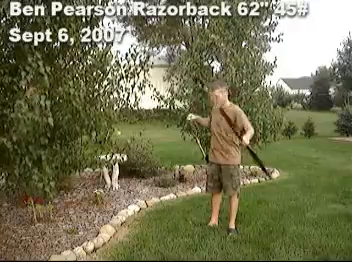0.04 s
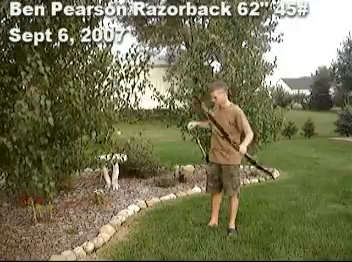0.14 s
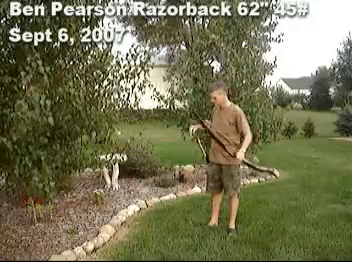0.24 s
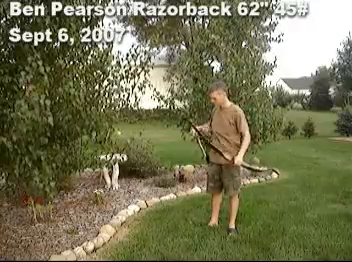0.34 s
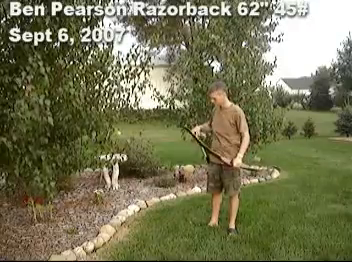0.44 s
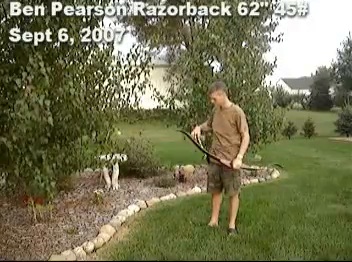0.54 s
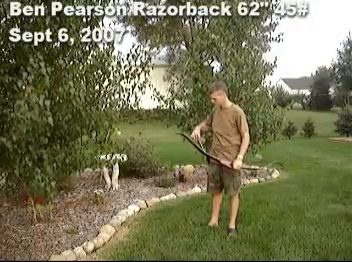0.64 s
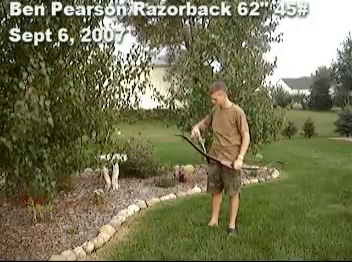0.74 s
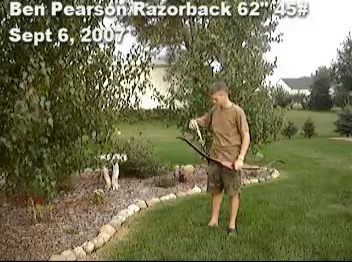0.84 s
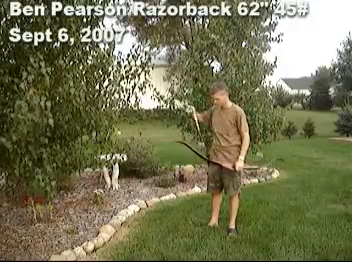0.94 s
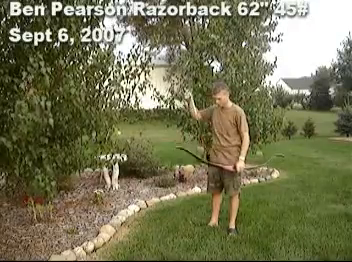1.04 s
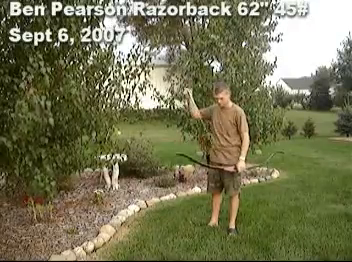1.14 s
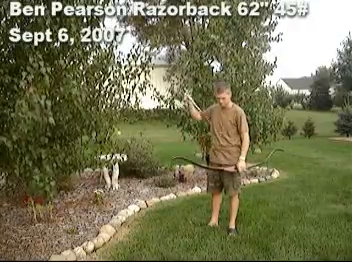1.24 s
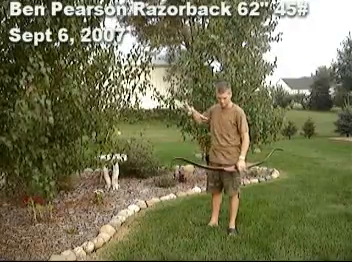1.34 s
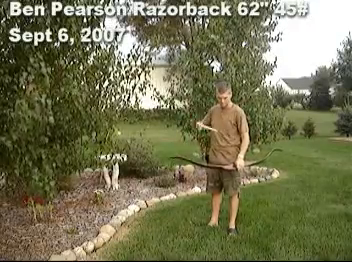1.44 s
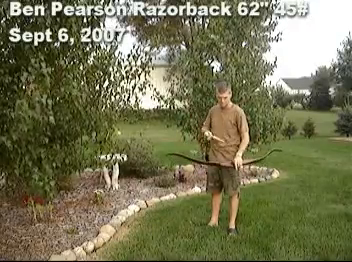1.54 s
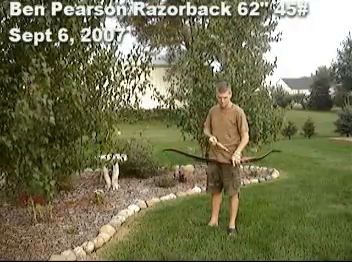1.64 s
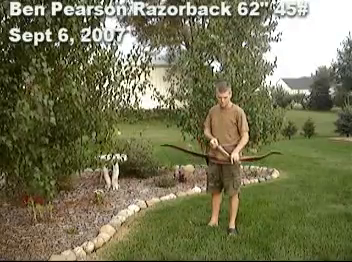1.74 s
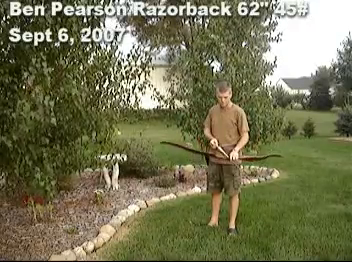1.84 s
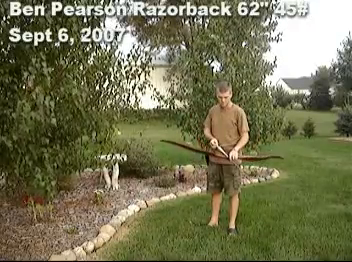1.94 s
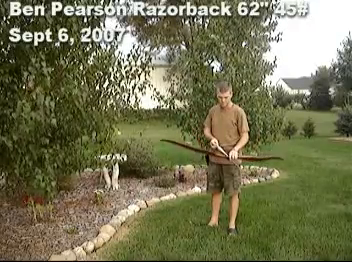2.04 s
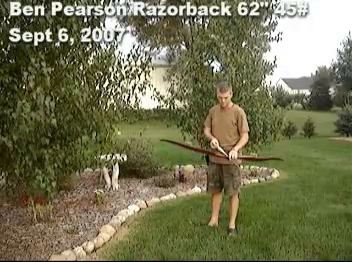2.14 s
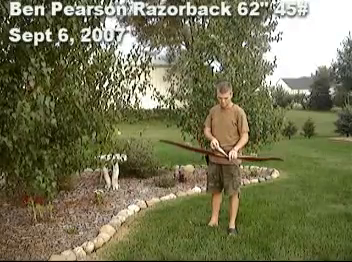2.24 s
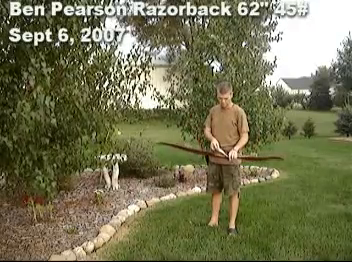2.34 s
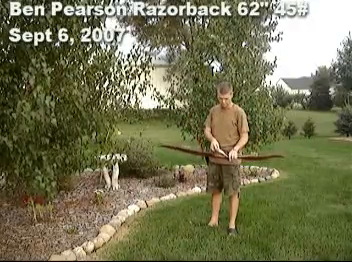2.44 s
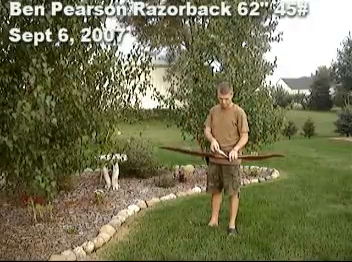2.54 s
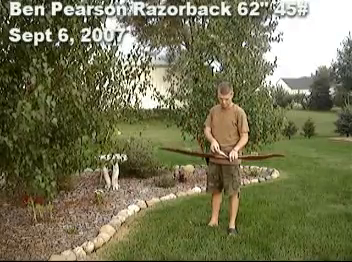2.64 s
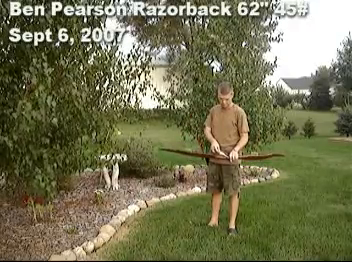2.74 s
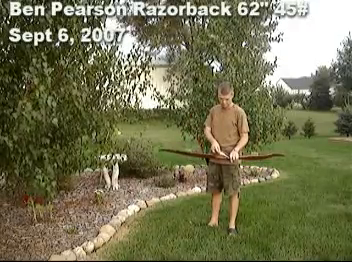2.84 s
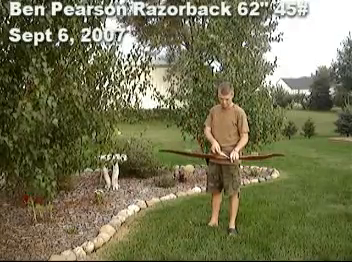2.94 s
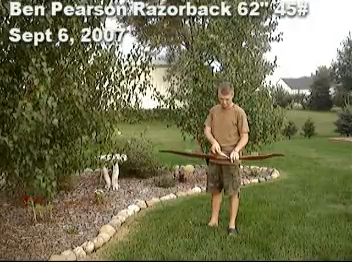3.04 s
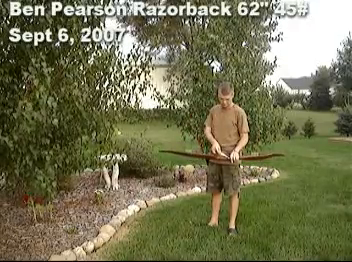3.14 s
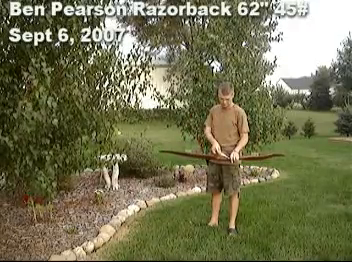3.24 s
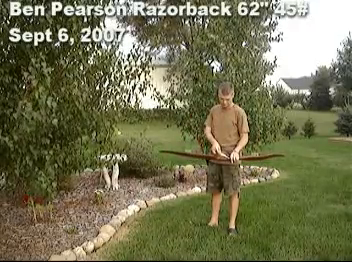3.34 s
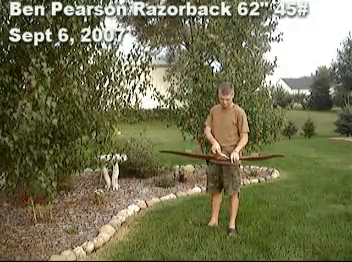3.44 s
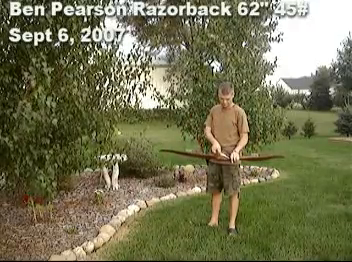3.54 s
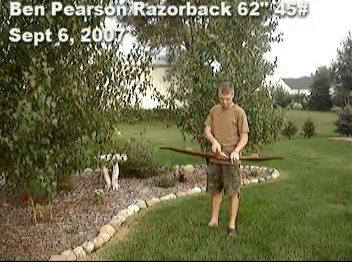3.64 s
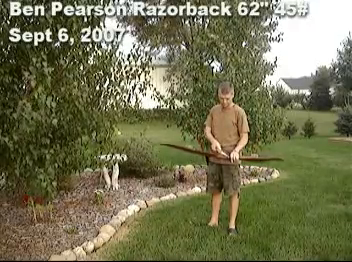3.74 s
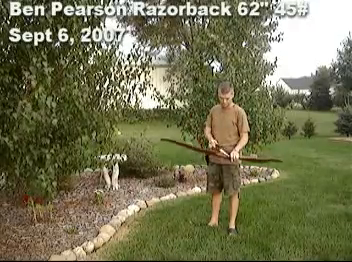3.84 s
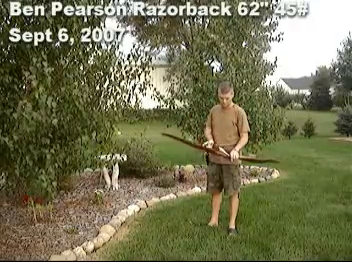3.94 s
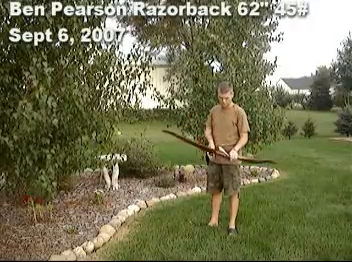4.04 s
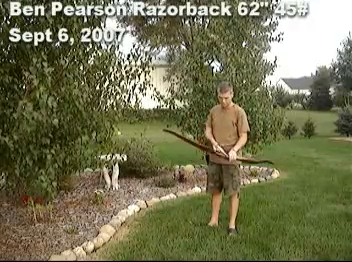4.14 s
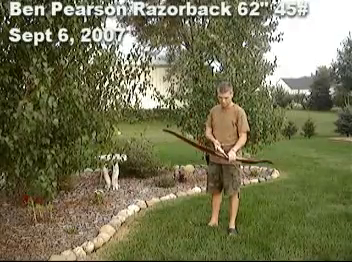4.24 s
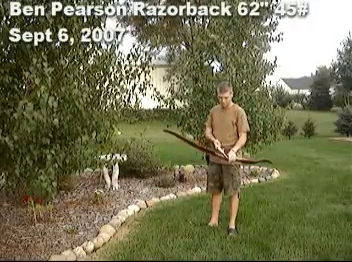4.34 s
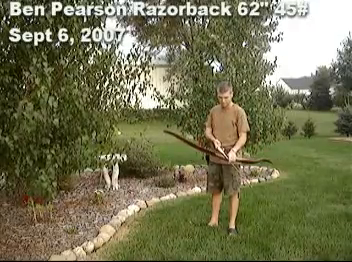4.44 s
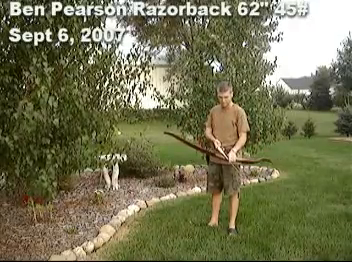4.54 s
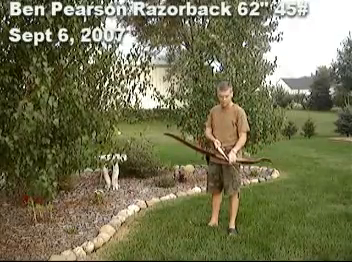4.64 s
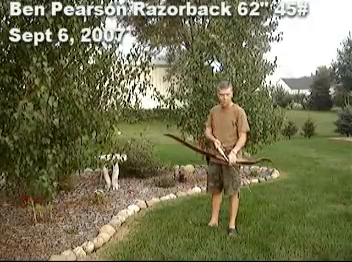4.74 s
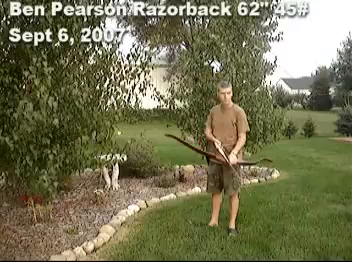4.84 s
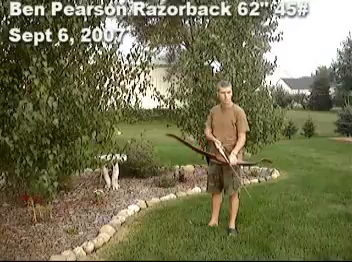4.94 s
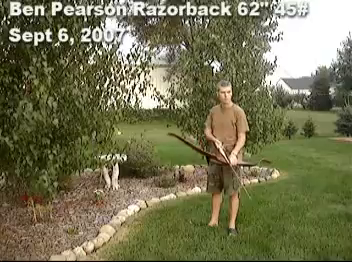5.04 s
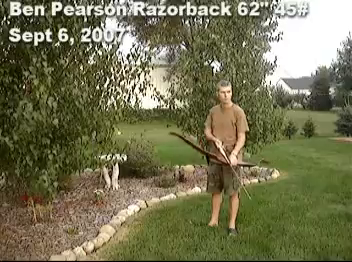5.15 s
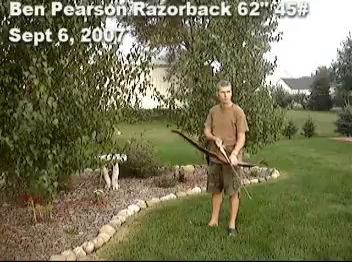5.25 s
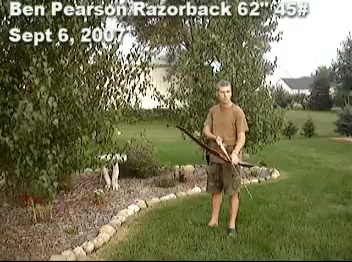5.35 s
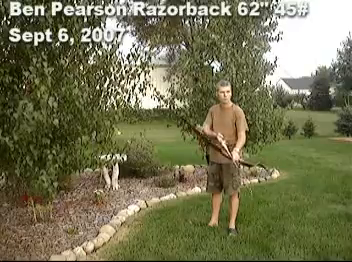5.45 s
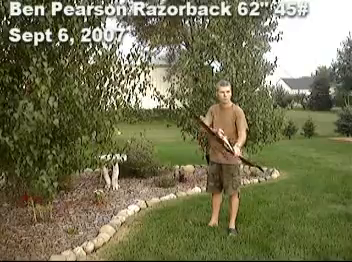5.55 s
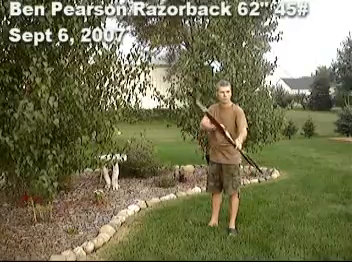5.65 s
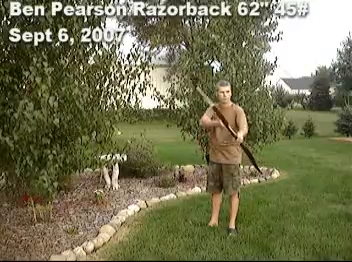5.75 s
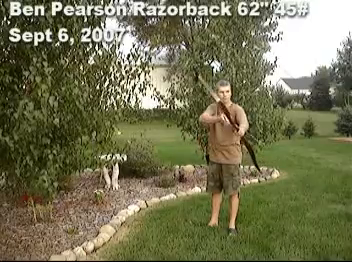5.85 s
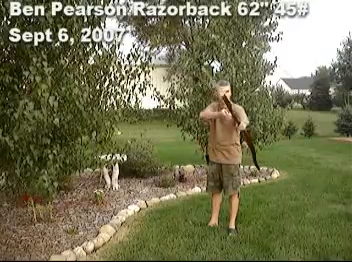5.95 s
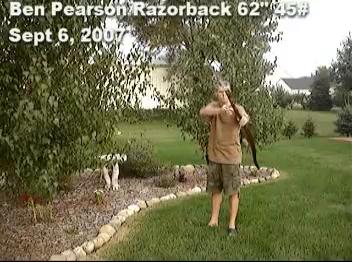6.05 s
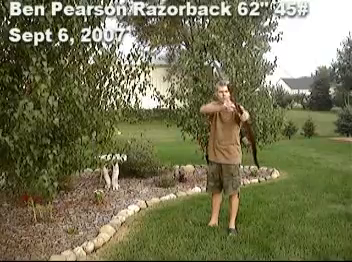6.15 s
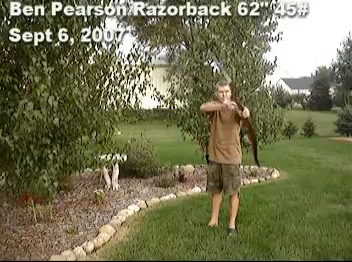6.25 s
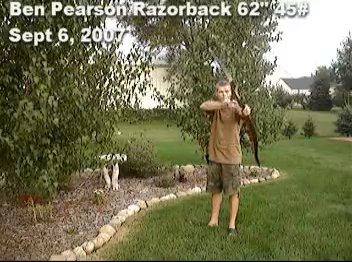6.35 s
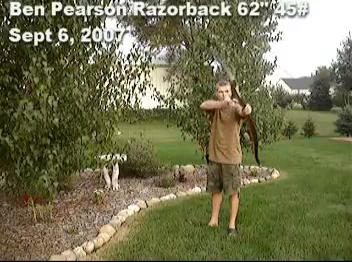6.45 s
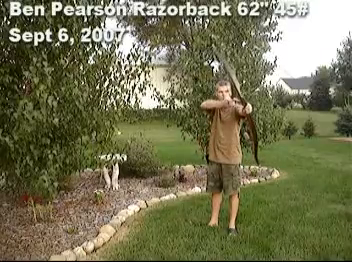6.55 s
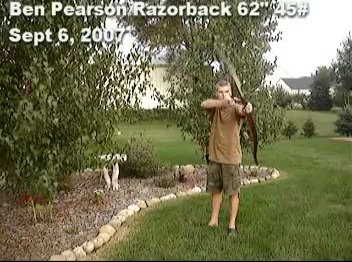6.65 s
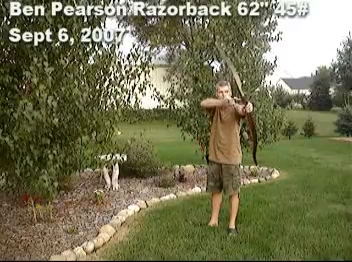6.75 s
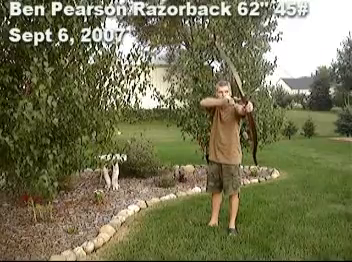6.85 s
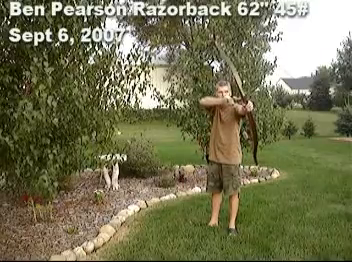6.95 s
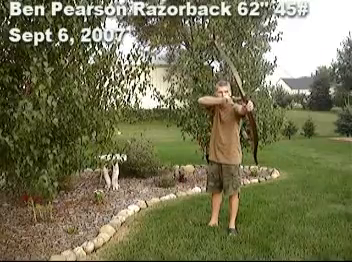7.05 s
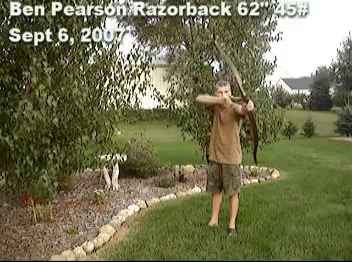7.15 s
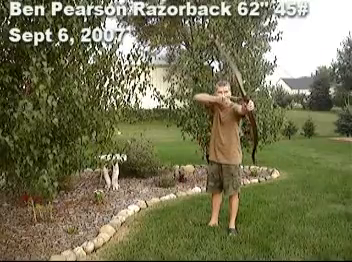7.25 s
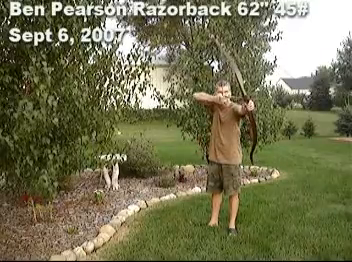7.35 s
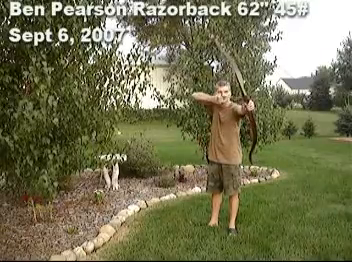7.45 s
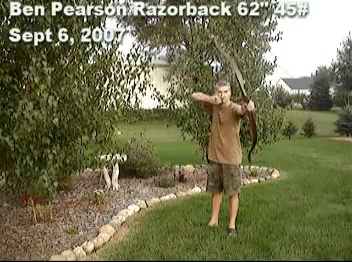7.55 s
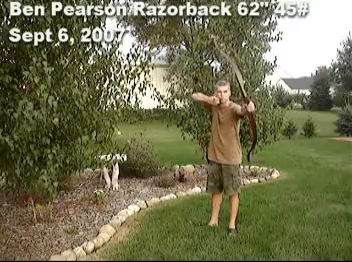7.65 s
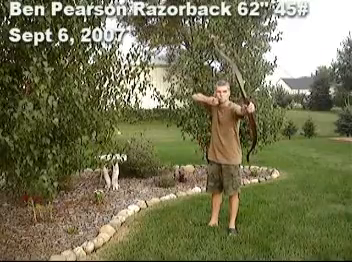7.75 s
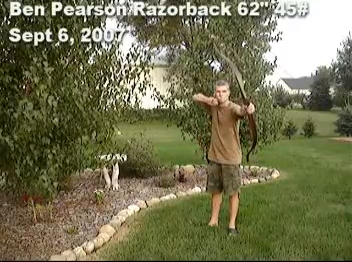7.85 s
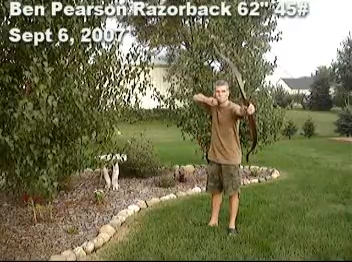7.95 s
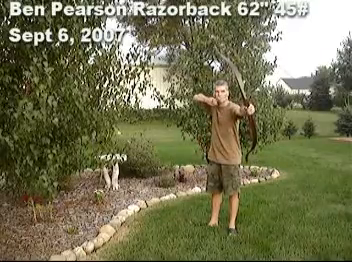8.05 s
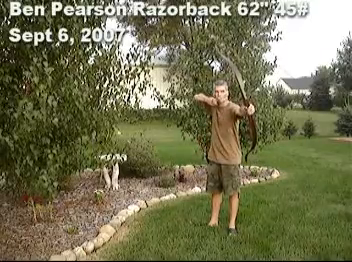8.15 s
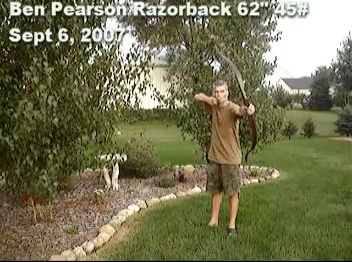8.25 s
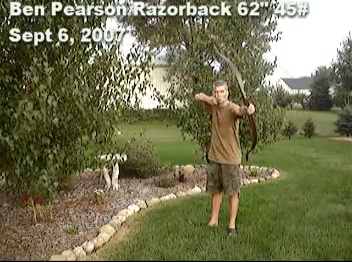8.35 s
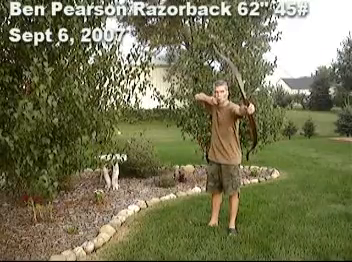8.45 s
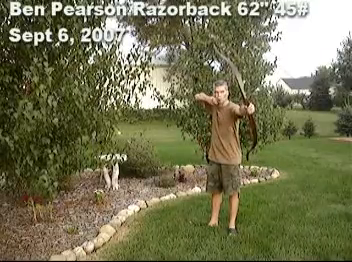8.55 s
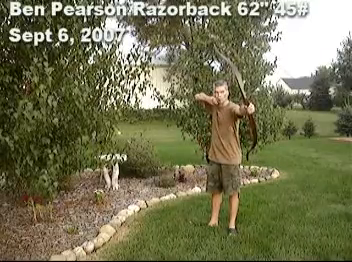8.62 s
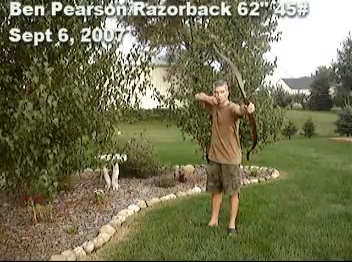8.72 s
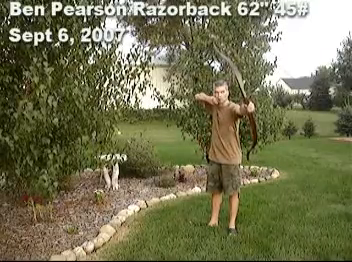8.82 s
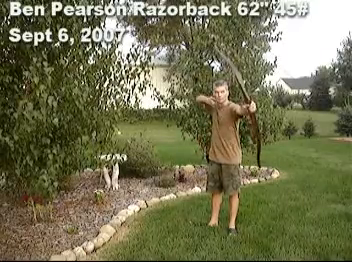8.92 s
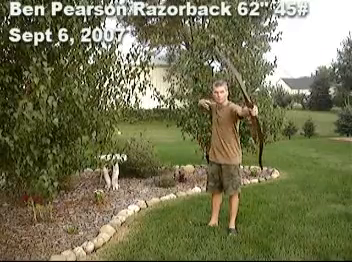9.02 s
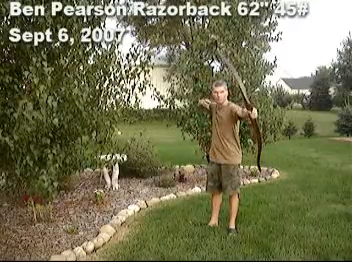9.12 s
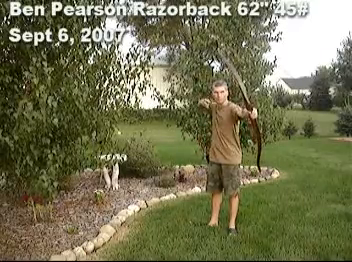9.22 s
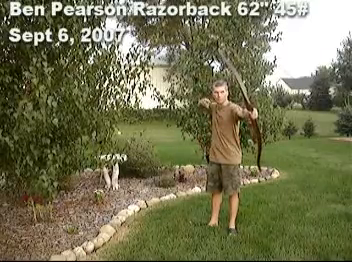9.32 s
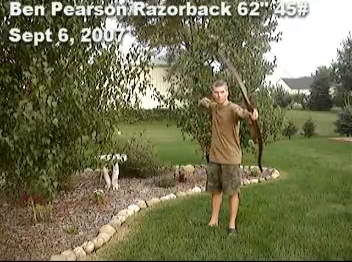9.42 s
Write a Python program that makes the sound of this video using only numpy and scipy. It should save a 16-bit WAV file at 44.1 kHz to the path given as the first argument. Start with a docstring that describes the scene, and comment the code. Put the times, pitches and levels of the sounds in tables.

```python
"""Archery on a suburban lawn

An arrow scrapes out of the quiver, is nocked, and is shot from a wooden recurve bow. The blows of the
release excite damped modes: the limbs thump, the shaft clatters past the riser, the string twangs.
The arrow smacks into a target near the microphone; shrubs and house walls scatter both events.
Crickets stridulate over far traffic, and eddies of a breeze nudge the microphone."""
import sys
import numpy as np
from scipy import signal
from scipy.fft import rfft, irfft
from scipy.io import wavfile

SR = 44100
rng = np.random.default_rng(int(sys.argv[2]) if len(sys.argv) > 2 else 0)


def digitize_waveform(pressure):
    """Quantize a signal to 16-bit integers and store it at the path in sys.argv[1].

    Rows of a 2-D input are taken as channels; values are limited to [-1, 1].
    """
    field = np.atleast_2d(pressure).T
    bounded = np.clip(field, -1, 1)
    quanta = np.round(bounded * 32767).astype(np.int16)
    wavfile.write(sys.argv[1], SR, quanta)


N = 418068
T = np.arange(N) / SR
EVENT_N = SR // 2  # half a second holds any one short event
EVENT_T = T[:EVENT_N]

# spectrum of far traffic and leaves: frequency_hz, gain_db
TRAFFIC_SPECTRUM = [(20, -11.5), (65, -1), (120, -4), (200, -4.5), (330, -2.5), (560, -2), (900, 2),
                    (1250, -1), (1800, -4), (2300, -12.5), (2650, -11.5), (3000, -16), (4000, -17),
                    (6200, -24.5), (11000, -29), (11700, -46)]
# slow swell of the traffic: time_s, relative_level_db
TRAFFIC_SWELL = [(0.0, -40.5), (0.1, -41), (1.04, -40), (3.57, -40), (4.81, -42), (8.9, -41)]
# puffs of wind on the microphone: peak_s, rise_s, level_db
PUFFS = [(0.016, 0.018, -39), (0.133, 0.054, -36.5), (0.259, 0.043, -34.5), (0.373, .045, -35),
         (0.456, 0.021, -32), (0.569, 0.035, -30), (0.932, .18, -45.5), (1.664, 0.056, -43.5),
         (1.847, 0.057, -37.5), (2.495, .025, -41.5), (4.571, 0.027, -44), (4.991, 0.026, -45)]
# spectrum of the garden's reflections: frequency_hz, gain_db
GARDEN_SPECTRUM = [(80, -5), (300, -3), (900, -3.5), (1600, -4), (2600, 0), (4500, 2), (9000, -3.5),
                   (12000, 2.5)]
# tree crickets: carrier_hz, strokes_per_s, droop_ratio, level_db
TRILLS = [(3608, 42, .02, -55), (3542, 44.3, .12, -57.3)]
# near field crickets: centre_s, length_s, carrier_hz, relative_level_db
CHIRPS = [(.215, .17, 4640, -47.5), (.42, .14, 4800, -57), (.45, 0.12, 5280, -54), (.71, .22, 4820, -51),
          (.95, 0.15, 4780, -56), (1.11, .2, 4640, -51), (1.24, 0.16, 4820, -53), (1.47, .11, 5260, -58),
          (1.57, .15, 4800, -51), (1.75, .15, 4870, -54), (1.99, .2, 4800, -53), (2.165, 0.18, 4700, -48.5),
          (2.35, 0.14, 5280, -53), (2.49, .13, 4800, -53.5), (2.735, 0.18, 4900, -49),
          (2.82, 0.092, 5220, -56), (2.89, 0.16, 4650, -51), (3.08, 0.15, 4800, -53), (3.24, .2, 4830, -52),
          (3.49, 0.17, 4620, -51), (3.67, 0.23, 4810, -52), (3.78, .11, 5280, -54), (4.11, .22, 4800, -53),
          (4.29, .2, 4670, -50), (4.61, 0.2, 4840, -48.5), (4.622, 0.098, 5230, -53),
          (5.02, 0.19, 4760, -55), (5.13, 0.12, 4790, -49), (5.5, 0.29, 4820, -50), (5.68, 0.14, 4690, -51),
          (5.81, 0.13, 4880, -50), (5.85, .11, 5240, -52), (6.06, 0.21, 4850, -50), (6.22, .14, 4740, -55),
          (6.56, 0.26, 4760, -51), (6.92, 0.21, 4770, -52), (7.06, .17, 4780, -49), (7.26, 0.1, 5270, -55),
          (7.36, 0.15, 4880, -50), (7.52, 0.16, 4800, -52.5), (7.82, .16, 4720, -51.5),
          (8.06, .17, 4630, -48.5), (8.27, 0.12, 4870, -52), (8.3, .11, 5250, -52),
          (8.55, .18, 4870, -49.5), (8.85, .16, 4620, -50.5), (9.32, .11, 5280, -54)]
# fall of pitch within a wing stroke, larger for low singers: carrier_hz, droop_ratio
STROKE_DROOP = [(4650, 0.182), (5250, 0.018)]
# katydid rasps: peak_s, relative_level_db
RASPS = [(2.075, -58.5), (3.895, -57), (4.75, -60), (5.83, -59), (6.95, -61), (8.095, -57)]
# spectrum of the shaft's scrape and of the wall's slap: frequency_hz, gain_db
SCRAPE_SPECTRUM = [(300, -6), (1200, 4), (2400, 2), (4500, 0), (7000, -7), (11000, -17)]
# squeaks of the sliding shaft: peak_s, pitch_hz, glide_hz_per_s, level_db
SQUEAKS = [(.985, 1517, 3500, -35.5), (1.144, 1560, -3000, -35.5)]
# the nock pushes onto the string and seats: start_s, level_db
NOCK_CLICKS = [(3.6325, -36), (3.6385, -38)]
# spectrum of those clicks: frequency_hz, gain_db
NOCK_SPECTRUM = [(500, -6), (1500, 5), (2300, 4), (3500, -2), (5500, -5), (7500, -15), (11000, -21)]
# knocks of the release: start_s, limb_db, shaft_db, crack_db
RELEASE_KNOCKS = [(8.9945, -8, -18, -18), (8.9959, -22, -21, -9.5), (8.9988, -12, -21, -11),
                  (9.0043, -23, -17.5, -29), (9.0076, -16, -24, -9.5), (9.0107, -10.5, -10.5, -12.5),
                  (9.0169, -21, -16, -23), (9.026, -34, -20.5, -30)]
# modes of the bow limbs: pitch_hz, gain_db, t60_s
LIMB_MODES = [(345, -6, 0.039), (459, 0, 0.046), (637, -11, 0.026), (765, -14.5, .04)]
# modes of the arrow shaft: pitch_hz, gain_db, t60_s
SHAFT_MODES = [(1015, -3, 0.055), (1280, -11, .035), (1430, -3.5, 0.04), (1536, -4.5, 0.07),
               (1840, -10, .035), (2020, -16, 0.035), (2300, -11, .035), (2450, -11, .04),
               (2720, -11, 0.037), (3060, -22, .03)]
# partials of the slackening string: pitch_hz, level_db, t60_s, sag_per_s
STRING_MODES = [(270, -31, .14, 2), (385, -30, 0.32, 1.5), (475, -29, .11, 3), (668, -24, 0.34, 2.3),
                (890, -34, 0.25, 1.5), (1060, -33, .24, 1.2)]
# spectrum of the string's crack: frequency_hz, gain_db
CRACK_SPECTRUM = [(100, -6), (400, 5.5), (1000, 0.5), (2600, 0.5), (3800, -7), (5200, -3.5), (6300, -10.5),
                  (7500, -12.5), (9200, -12), (11500, -32)]
# short, fading ticks after the release: start_s, level_db
AFTER_TICKS = [(9.0385, -28), (9.0705, -34), (9.0777, -35), (9.099, -35), (9.114, -39), (9.1385, -41),
               (9.157, -37)]
# spectrum of those ticks: frequency_hz, gain_db
AFTER_TICK_SPECTRUM = [(400, -10), (1200, 3), (2000, -2), (2800, 1), (4500, -5), (6500, -10), (10000, -14),
                       (11500, -30)]
# modes of the target face and buried point: pitch_hz, gain_db, t60_s
TARGET_MODES = [(280, -20, 0.055), (626, 5, 0.0067), (950, 3.5, 0.0048), (1420, -16, 0.025),
                (3300, -13, 0.016)]
# spectrum of the point's smack: frequency_hz, gain_db
SMACK_SPECTRUM = [(200, -24.5), (700, -15), (2400, 3), (4500, 3), (6000, -6), (9000, -2.5), (10200, -7),
                  (11000, -38)]
# a brief, faint high hiss just after the hit, then lower bursts: start_s, centre_hz, level_db
AFTER_HIT_BURSTS = [(9.3835, 8300, -44), (9.3865, 3300, -37), (9.3875, 1300, -35), (9.407, 1900, -41),
                    (9.4145, 2100, -36)]
# spectrum of the strike as foliage returns it: frequency_hz, gain_db
HIT_ECHO_SPECTRUM = [(80, -13), (220, 4), (450, 6), (850, 1), (1400, -16), (2100, -7), (2900, -19),
                     (4000, -14), (6000, -26), (9000, -24), (11500, -44)]

RELEASE_S, HIT_S = RELEASE_KNOCKS[0][0], 9.3603


def undb(db):
    """Amplitude ratio of a level in decibels."""
    return 10 ** (np.asarray(db) / 20)


def unit(x):
    """Normalisation to rms 1."""
    return x / np.sqrt(np.mean(x ** 2))


def fade(t60_s):
    """Exponential decay, by 60 dB in t60_s."""
    return np.exp(-np.log(1000) * EVENT_T / t60_s)


def swell(rise_s):
    """Raised-cosine envelope that peaks at rise_s and falls in equal time."""
    return np.sin(np.pi / 2 * np.minimum(EVENT_T / rise_s, 2)) ** 2


def walk(rate_hz, size=N):
    """Random modulation with a spread near 1."""
    return np.interp(T[:size] * rate_hz, np.arange(4096), rng.standard_normal(4096))


def add(out, start_s, x):
    """Superposition of x onto out from start_s."""
    i = max(int(round(start_s * SR)), 0)
    out[i:i + len(x)] += x[:max(len(out) - i, 0)]


def tone(hz):
    """A sinusoid whose phase is the integral of its frequency."""
    return np.sin(2 * np.pi * np.cumsum(hz) / SR)


def noise(spectrum, size=EVENT_N):
    """Spectrally shaped noise of rms 1."""
    hz, db = np.transpose(spectrum)
    bins_hz = np.maximum(np.fft.rfftfreq(size, 1 / SR), 1)
    gain = undb(np.interp(np.log(bins_hz), np.log(hz), db))
    return unit(irfft(rfft(rng.standard_normal(size)) * gain, size))


def band(low_hz, high_hz, size=EVENT_N):
    """Band-limited noise of rms 1."""
    sos = signal.butter(2, [low_hz, high_hz], "band", fs=SR, output="sos")
    return unit(signal.sosfilt(sos, rng.standard_normal(size)))


def ring(modes, stretch=1):
    """Impulse response of damped modes of alternating sign; stretch scales their pitch."""
    return sum((-1) ** k * undb(db) * fade(t60_s) * np.sin(2 * np.pi * hz * stretch * EVENT_T)
               for k, (hz, db, t60_s) in enumerate(modes))


def radiate(x, low_hz):
    """Radiation efficiency: slim bodies move little air at low frequency."""
    return signal.sosfilt(signal.butter(4, low_hz, "high", fs=SR, output="sos"), x)


def garden(x, leaf_db, delay_s, t60_s, wall_s, wall_db, wall_t60_s=.082):
    """Scattering by leaves gives a thin tail; reflection from a house wall, one smeared echo."""
    response = np.zeros(SR)
    add(response, delay_s, undb(leaf_db) * unit(noise(GARDEN_SPECTRUM) * fade(t60_s)))
    add(response, wall_s, undb(wall_db) * unit(noise(GARDEN_SPECTRUM) * fade(wall_t60_s)))
    return signal.fftconvolve(x, response)[:N] / np.sqrt(EVENT_N)


def traffic(gain_db=1.03, engine_hz=290, engine_db=-55.5, nearest_s=5.75, spread_s=.97):
    """Far traffic and leaves sum incoherently; one engine's tone swells as it nears, then recedes."""
    passage = np.exp(-((T - nearest_s) / spread_s) ** 2)
    engine = tone(engine_hz * (1 + .011 * walk(25))) * passage
    level_db = np.interp(T, *np.transpose(TRAFFIC_SWELL)) + gain_db
    wash = noise(TRAFFIC_SPECTRUM, N) * undb(level_db + .32 * walk(10))
    return wash + undb(engine_db + 2 * walk(8)) * engine


def breeze(low_hz=42, eddy_db=-57, calming_db_per_s=1.5, top_hz=162, ref_db=-35, octaves_per_db=.04):
    """Turbulent pressure on the microphone: eddies die down, and stronger puffs reach higher in pitch."""
    out = band(low_hz, 130, N) * undb(eddy_db + 4.5 * walk(12) - calming_db_per_s * T)
    for peak_s, rise_s, db in PUFFS:
        edge_hz = top_hz * 2 ** (octaves_per_db * (db - ref_db))
        puff = unit(band(low_hz, edge_hz) * swell(rise_s))
        add(out, peak_s - rise_s, undb(db) * puff * np.sqrt(rise_s / EVENT_T[-1]))
    return out


def wing_strokes(t, hz, rate_hz, droop, rest=0., detune=0.):
    """Stridulation: each wing closure is one falling tone pulse; rest is the ringing in between."""
    stroke, cycle = np.divmod(t * rate_hz, 1)
    force, offset = rng.standard_normal((2048, 2))[stroke.astype(int)].T
    pitch_hz = hz * (1 + droop * (.5 - cycle) + detune * offset)
    pulses = undb(1.5 * force) * np.sin(np.pi * cycle) ** 4
    return (rest + pulses) * tone(pitch_hz)


def tree_crickets():
    """Two unbroken pulse trains of unequal rate drift in and out of phase."""
    out = np.zeros(N)
    for hz, rate_hz, droop, db in TRILLS:
        uneven_t = T + .0012 * walk(5)
        pitch_hz = hz * (1 + .005 * walk(120))
        song = wing_strokes(uneven_t, pitch_hz, rate_hz, droop, rest=.16, detune=.006)
        out += unit(song) * undb(db + 1.1 * walk(12))
    return out + garden(out, leaf_db=-7, delay_s=.008, t60_s=.37, wall_s=.05, wall_db=-11.5)


def chirp(hz, length_s, strokes_per_s=22, climb_per_s=.142, blur_db=-14, blur_width=.045):
    """A few wing strokes swell, climb and fade; teeth modulate their pitch and foliage blurs it."""
    t = T[:int(length_s * SR)]
    rate_hz = strokes_per_s * rng.uniform(.9, 1.1)
    teeth = .011 * np.interp(t * 900, np.arange(512), rng.standard_normal(512))
    pitch_hz = hz * (1 + climb_per_s * (t - length_s / 2) + teeth)
    droop = np.interp(hz, *np.transpose(STROKE_DROOP))
    uneven_t = t + .004 * walk(20, len(t))
    strokes = wing_strokes(uneven_t, pitch_hz, rate_hz, droop, detune=.01196)
    blur = undb(blur_db) * band(hz * (1 - blur_width), hz * (1 + blur_width), len(t))
    return (strokes + blur) * np.sin(np.pi * t / length_s)


def chirpers(far_gain_db=-59, far_hz=4750, far_count=24, rasp_rise_s=.028):
    """Stridulation in bursts: near field crickets in turn, far ones at random, and a rasping katydid."""
    out = np.zeros(N)
    for centre_s, length_s, hz, db in CHIRPS:
        add(out, centre_s - length_s / 2, undb(db) * chirp(hz, length_s))
    for k, (lag, detune) in enumerate(rng.random((far_count, 2))):
        hz = far_hz * (1 + .04 * (detune - .5))
        add(out, (k + lag) * T[-1] / far_count, undb(far_gain_db) * chirp(hz, length_s=.27))
    for peak_s, db in RASPS:
        add(out, peak_s - rasp_rise_s, undb(db) * swell(rasp_rise_s) * band(7000, 8700))
    return out


def insects(near_gain_db=2.9, chorus_db=-65.5, high_db=-69, buzz_s=5.2, buzz_db=-65):
    """Far singers merge into noise bands behind the near ones; an amplitude-modulated buzz joins late."""
    chorus = undb(chorus_db + 3.2 * walk(9)) * band(4300, 4940, N)
    chorus += undb(high_db) * band(8000, 9000, N)
    high_trill = wing_strokes(T, 8500 * (1 + .012 * walk(120)), rate_hz=57, droop=.02, rest=.15)
    chorus += undb(high_db) * unit(high_trill)
    buzz = band(5330, 6200, N) * (1 + .5 * np.sin(2 * np.pi * 78 * T))
    buzz *= np.clip((T - buzz_s) / .3, 0, 1)
    chirps = undb(near_gain_db) * chirpers()
    chirps += garden(chirps, leaf_db=-15, delay_s=.006, t60_s=.13, wall_s=.03, wall_db=-15)
    return tree_crickets() + chirps + chorus + undb(buzz_db) * buzz


def handling(slide_peak_s=1.07, slide_rise_s=.25, slide_db=-49.5, squeak_rise_s=.028):
    """Friction makes the shaft scrape and squeak out of the quiver; later the nock clicks home."""
    out = np.zeros(N)
    scrape = undb(slide_db) * swell(slide_rise_s) * noise(SCRAPE_SPECTRUM)
    add(out, slide_peak_s - slide_rise_s, scrape)
    out *= undb(3 * walk(90))
    for peak_s, hz, glide, db in SQUEAKS:  # one while speeding up, one while slowing
        pitch_hz = (hz + glide * (EVENT_T - squeak_rise_s)) * (1 + .015 * walk(370, EVENT_N))
        add(out, peak_s - squeak_rise_s, undb(db) * swell(squeak_rise_s) * tone(pitch_hz))
    for start_s, db in NOCK_CLICKS:
        add(out, start_s, undb(db) * noise(NOCK_SPECTRUM) * fade(t60_s=.04))
    return out


def twang(waver=.021, rough_db=7, rise_s=.014):
    """Free vibration of the string on shaking limbs: every partial sinks as the swing dies."""
    out = np.zeros(EVENT_N)
    for hz, db, t60_s, sag_per_s in STRING_MODES:
        pitch_hz = hz * np.exp(-sag_per_s * EVENT_T) * (1 + waver * walk(150, EVENT_N))
        out += undb(db + rough_db * walk(134, EVENT_N)) * fade(t60_s) * tone(pitch_hz)
    return out * np.minimum(EVENT_T / rise_s, 1)


def thud_and_ticks(flicker_db=4, taut_s=9.008, thud_hz=217, thud_db=-21.5, thud_t60_s=.052):
    """The string comes taut and stops the limbs, exciting a low mode; short, fading ticks follow."""
    out = np.zeros(N)
    for start_s, db in AFTER_TICKS:
        add(out, start_s, undb(db) * noise(AFTER_TICK_SPECTRUM) * fade(t60_s=.036))
    out *= undb(flicker_db * walk(360))
    add(out, taut_s, radiate(ring([(thud_hz, thud_db, thud_t60_s)]), low_hz=90))
    return out


def bow(flex=.018, crack_t60_s=.015, twang_delay_s=.029):
    """Impulsive excitation: the limbs spring, the flexing shaft knocks the riser, the string twangs."""
    out = np.zeros(N)
    limbs = ring(LIMB_MODES)
    for start_s, limb_db, shaft_db, crack_db in RELEASE_KNOCKS:
        shaft = ring(SHAFT_MODES, stretch=1 + flex * rng.uniform(-1.1, 1))
        t60_s = crack_t60_s + .8 * (start_s - RELEASE_S)  # later cracks ring longer
        crack = noise(CRACK_SPECTRUM) * fade(t60_s)
        add(out, start_s, undb(limb_db) * limbs + undb(shaft_db) * shaft + undb(crack_db) * crack)
    out = radiate(out, low_hz=280)
    add(out, RELEASE_S + twang_delay_s, twang())
    return out


def flight(delay_s=.025, level_db=-44, flutter_db=6.5):
    """Aerodynamic noise: the feathers flutter and hiss until the flexing shaft straightens."""
    out = np.zeros(N)
    add(out, RELEASE_S + delay_s, undb(level_db) * swell(rise_s=.046) * band(1800, 9500))
    return out * undb(flutter_db * walk(150))


def hit_echo(leaf_s=.022, leaf_db=-30, wall_s=.052, wall_db=-41):
    """Diffuse scattering by foliage returns the smack as a wash; a wall reflects a brighter slap."""
    out = np.zeros(N)
    add(out, HIT_S + leaf_s, undb(leaf_db) * noise(HIT_ECHO_SPECTRUM) * fade(t60_s=.23))
    add(out, HIT_S + wall_s, undb(wall_db) * noise(SCRAPE_SPECTRUM) * fade(t60_s=.091))
    return out


def tearing(start_hz=2700, end_hz=1680, fall_s=.0028, peak_s=.0015, level_db=-10):
    """Deceleration: the point tears through the face with a zip whose pitch falls as it slows."""
    pitch_hz = end_hz + (start_hz - end_hz) * np.exp(-EVENT_T / fall_s)
    envelope = EVENT_T / peak_s * np.exp(1 - EVENT_T / peak_s)
    return undb(level_db) * envelope * tone(pitch_hz)


def braking(length_s=.014, slip_hz=654, slowing=.42, gain_db=-18, rub_db=-11.5, build_db=3):
    """Stick-slip friction in the packing: the shaft groans, rasps on each slip, slows and stops dead."""
    progress = np.minimum(EVENT_T / length_s, 1)
    slips = tone(slip_hz * (1 - slowing * progress ** 2))
    rub = undb(rub_db) * band(1700, 2300) * (1 + .5 * slips)
    grip = np.clip(np.minimum(progress, 1 - progress) / .13, 0, 1)
    return undb(gain_db) * grip * (undb(build_db * progress) * slips + rub)


def target(smack_db=-15, face_gain_db=-1.5, burst_width=.17, rock_hz=228, rock_db=-17, rock_t60_s=.043):
    """Inelastic impact: the point punches through the face, the shaft brakes, faint bursts follow."""
    out = np.zeros(N)
    smack = undb(smack_db) * noise(SMACK_SPECTRUM) * fade(t60_s=.013)
    face = -undb(face_gain_db) * ring(TARGET_MODES)  # negative: pushed inwards
    add(out, HIT_S, radiate(smack + face, low_hz=290))
    add(out, HIT_S, tearing())
    add(out, 9.366, braking())
    for start_s, hz, db in AFTER_HIT_BURSTS:
        burst = band(hz * (1 - burst_width), hz * (1 + burst_width))
        add(out, start_s, undb(db) * burst * fade(t60_s=.043))
    # the whole target rocks back as it takes the arrow's weight
    add(out, 9.3715, radiate(ring([(rock_hz, rock_db, rock_t60_s)]), low_hz=91))
    return out


def scene():
    """All sources superpose at one microphone, which feeds both channels."""
    shot = bow()
    shot += garden(shot, leaf_db=-12.5, delay_s=.016, t60_s=.53, wall_s=.056, wall_db=-17)
    archery = shot + thud_and_ticks() + flight() + target() + hit_echo() + handling()
    mono = archery + insects() + traffic() + breeze()
    return np.array([mono, mono])


def record(dry):
    """Saturation and band limiting: a small camera flattens the loudest peaks and cuts the top."""
    ceiling, top_hz = .92, 12000
    low_pass = signal.ellip(12, .2, 95, top_hz, fs=SR, output="sos")
    return signal.sosfilt(low_pass, np.clip(dry, -ceiling, ceiling))


dry = scene()
out = record(dry)
digitize_waveform(out)
```